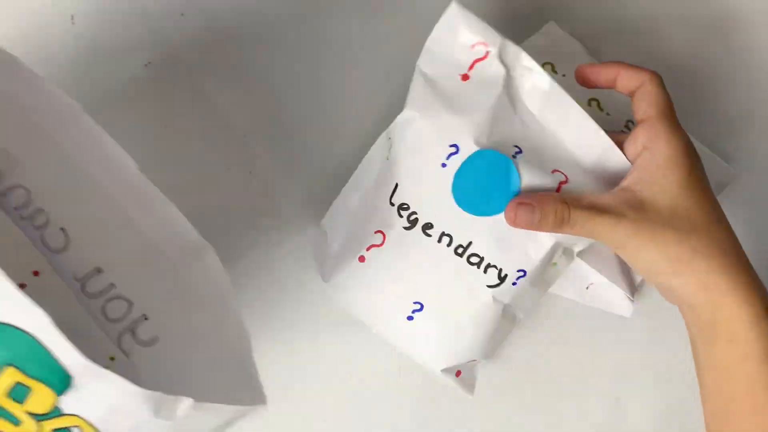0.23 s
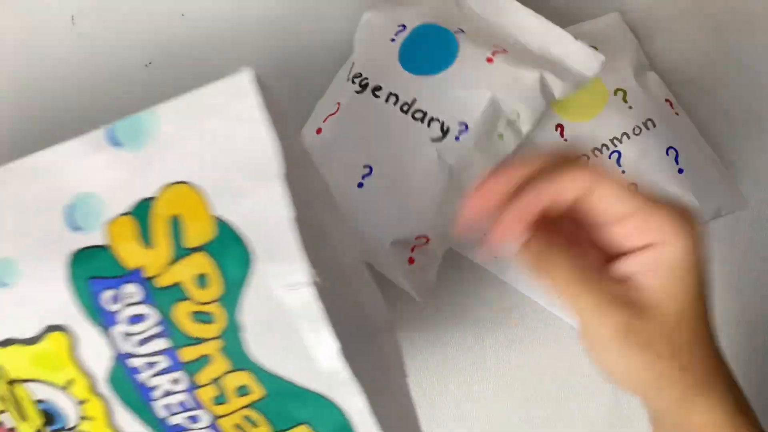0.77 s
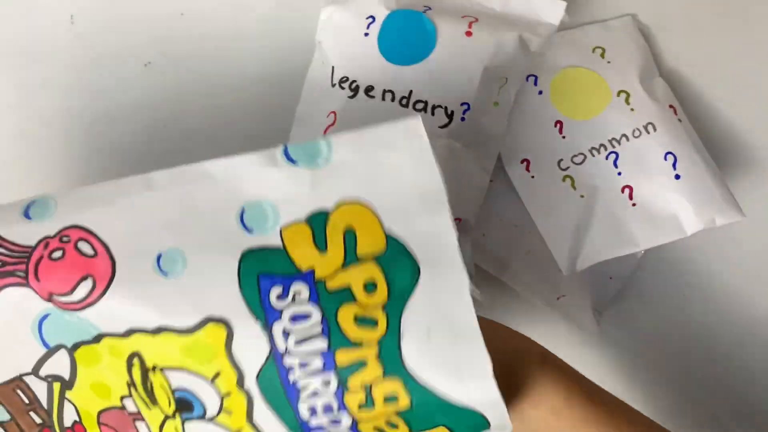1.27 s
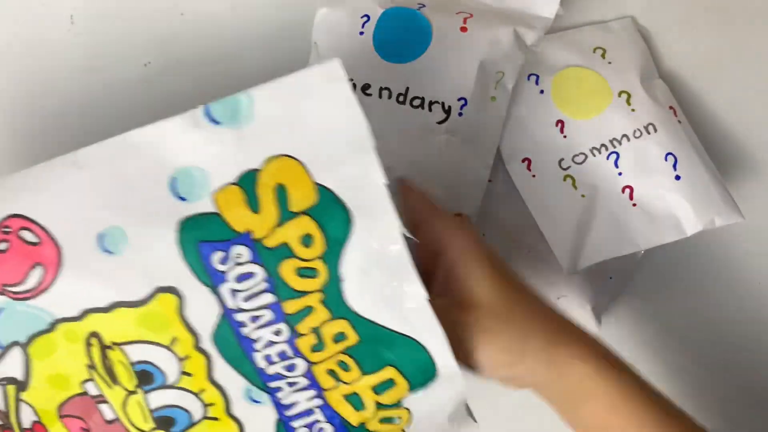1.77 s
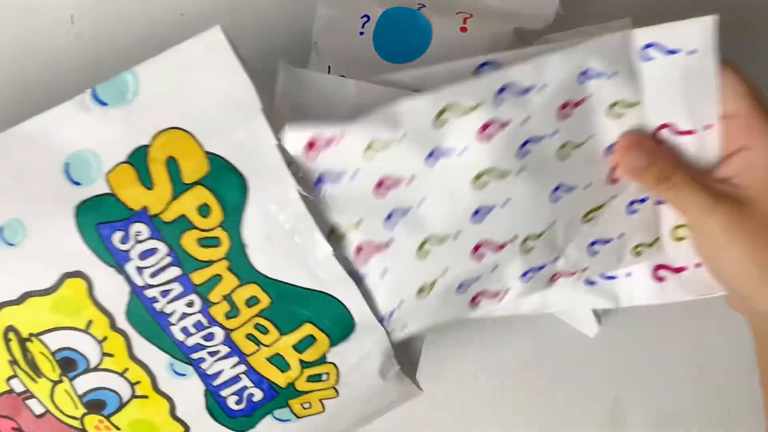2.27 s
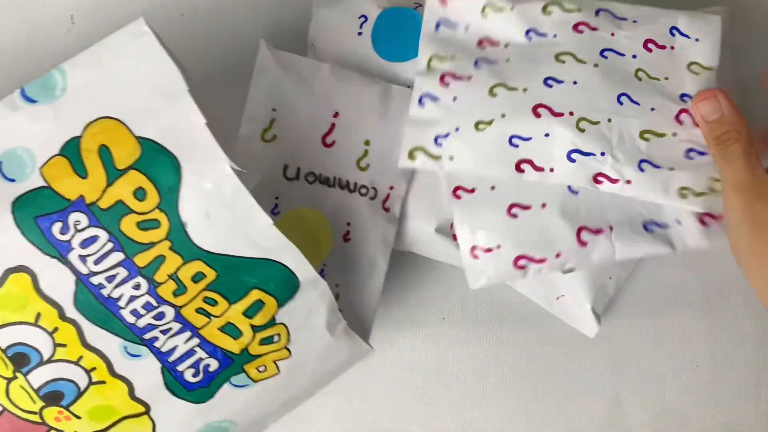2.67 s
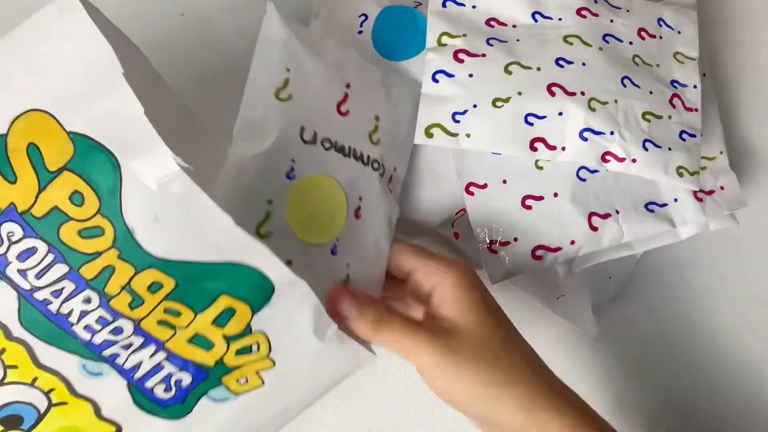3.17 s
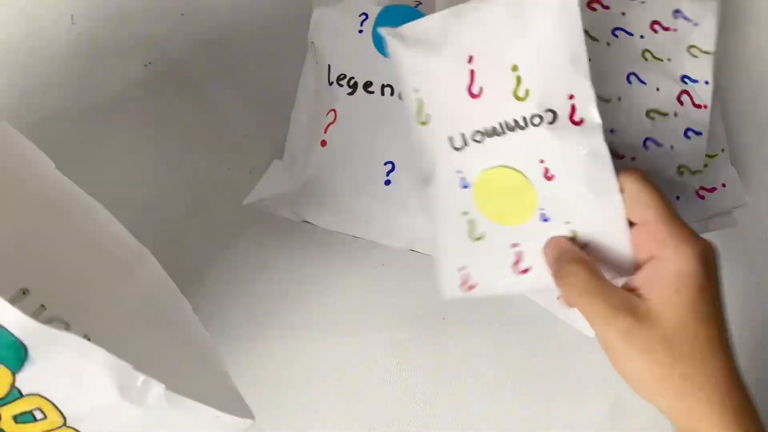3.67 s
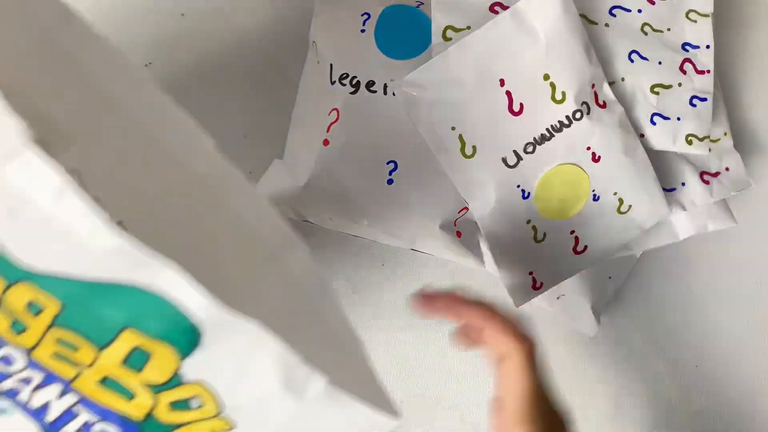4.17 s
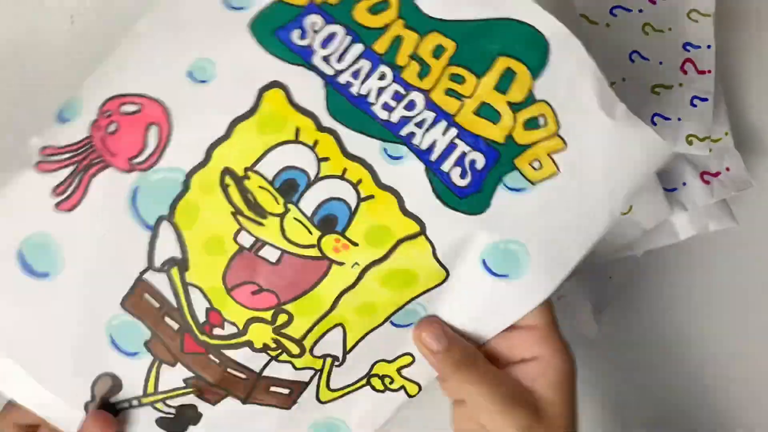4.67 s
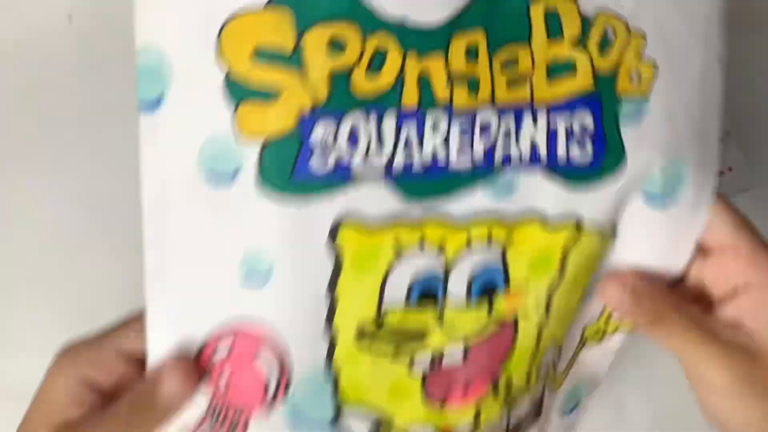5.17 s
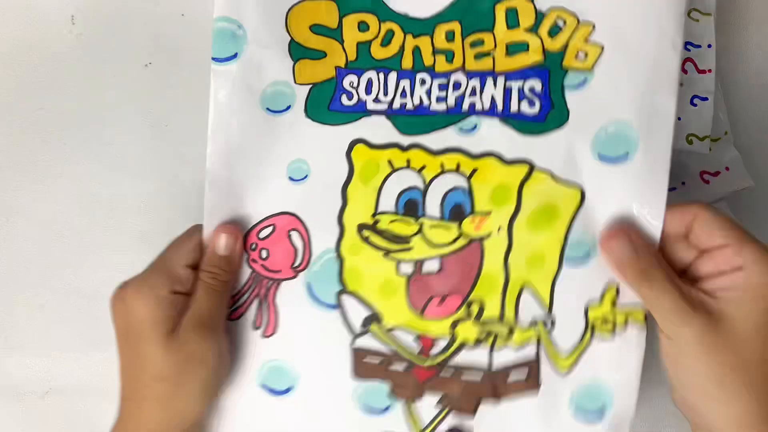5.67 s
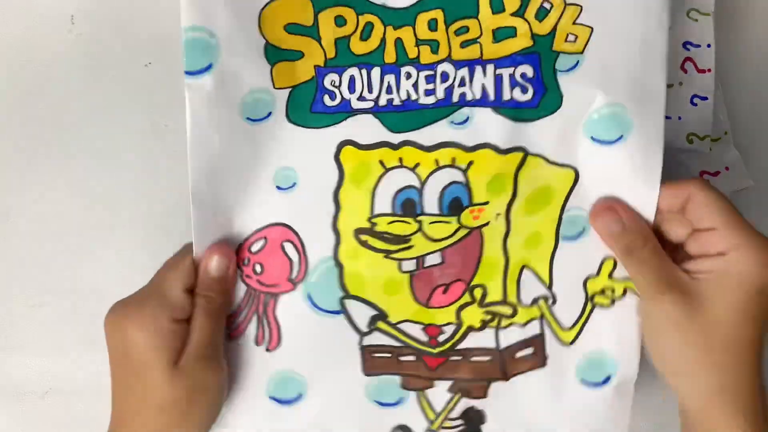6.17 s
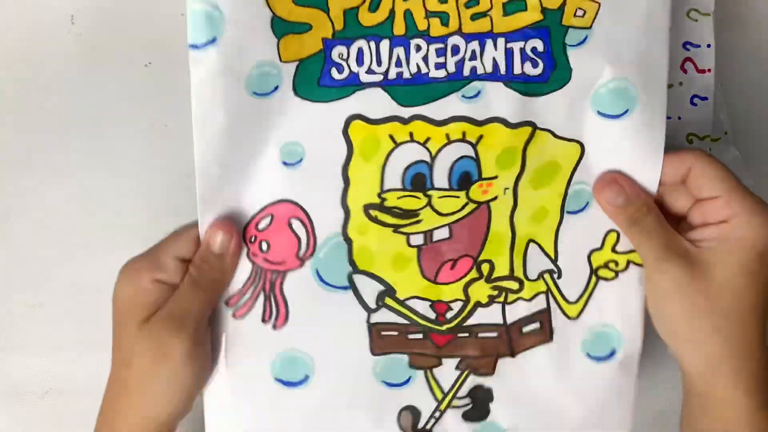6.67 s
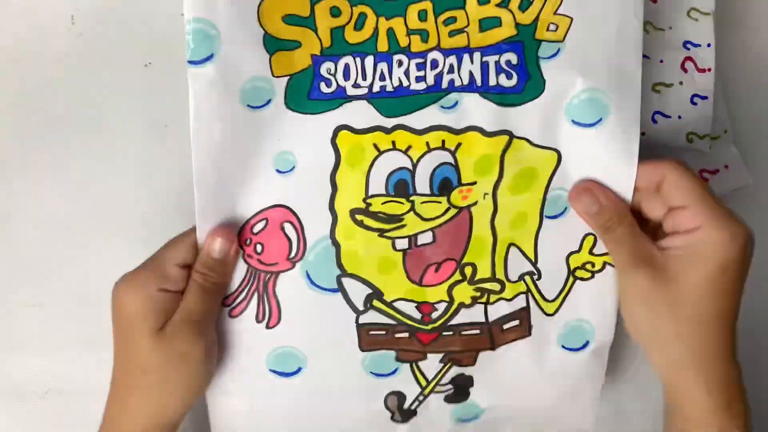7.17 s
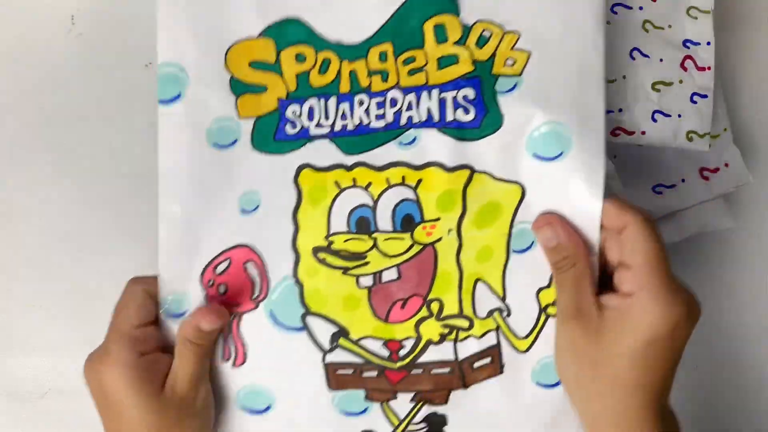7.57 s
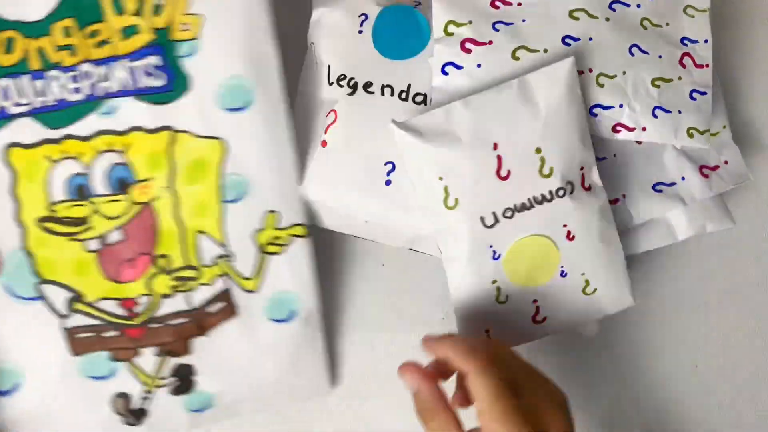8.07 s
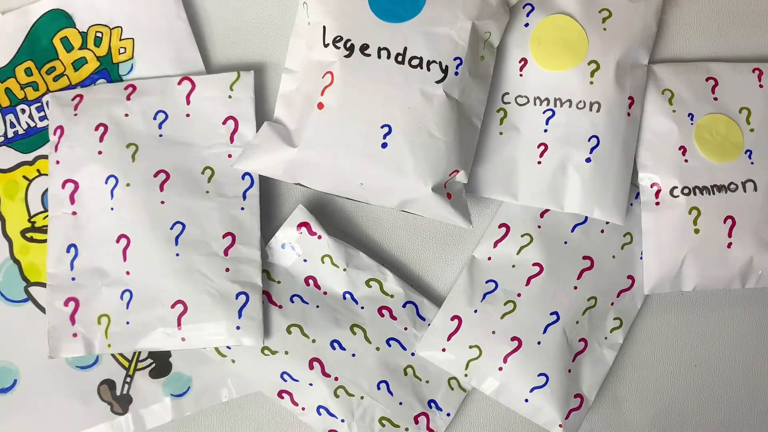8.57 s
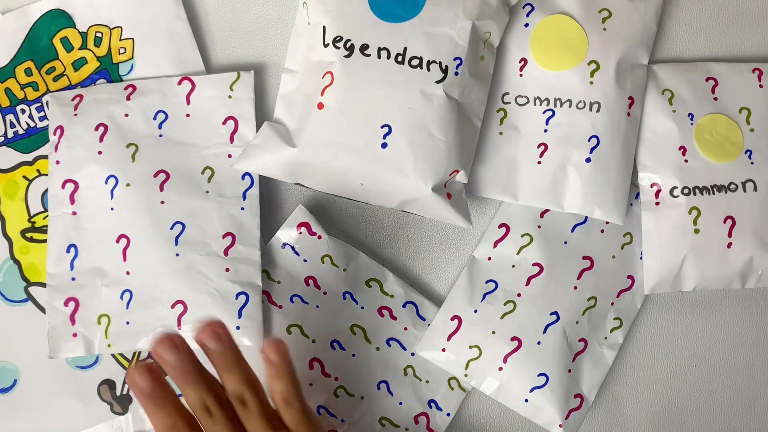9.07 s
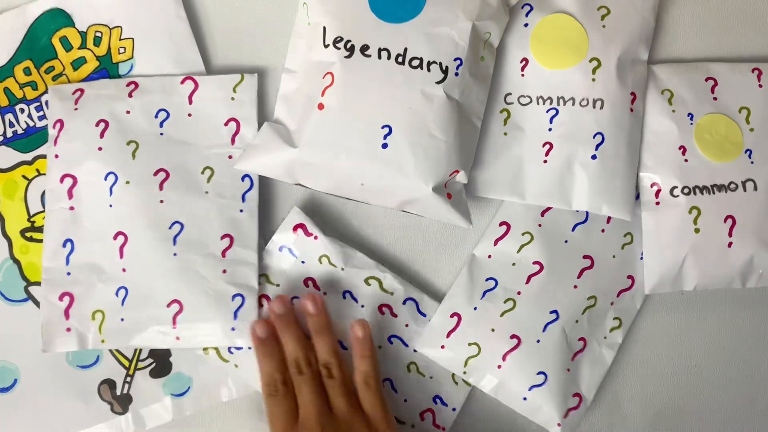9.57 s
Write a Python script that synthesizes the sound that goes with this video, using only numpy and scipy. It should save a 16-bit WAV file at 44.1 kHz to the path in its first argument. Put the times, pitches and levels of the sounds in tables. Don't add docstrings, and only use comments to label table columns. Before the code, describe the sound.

Close stereo microphone above a table in a small, fairly dry room. A crisp paper snap, then small stiff bags are pulled out and piled with dense crackles, pops and grainy sliding. A large bag is turned and shaken with hollow flaps and soft air thumps. Near the end the handling nearly stops and low room rumble dominates.

```python
import sys
import numpy as np
from scipy import signal
from scipy.fft import rfft, irfft, next_fast_len
from scipy.io import wavfile
from scipy.ndimage import uniform_filter1d, minimum_filter1d

SR = 44100
rng = np.random.default_rng(int(sys.argv[2]) if len(sys.argv) > 2 else 0)


def unload_audio(sound):
    columns = np.transpose(np.atleast_2d(sound))
    steps = np.round(np.clip(columns, -1, 1) * 32767)
    wavfile.write(sys.argv[1], SR, steps.astype(np.int16))


def invert_db(x):
    u = np.asarray(x, float) / 20
    return 10 ** u


N = 433062
CHANGE_S = 8.468
LEAD_S = 0.02

# (resonance [Hz], width [Hz], level [dB])
PANELS = [(341, 37, 1.5), (610, 173, -2), (709, 94, 5.5), (873, 104, -8), (1024, 224, -13),
          (1598, 150, -24), (2150, 410, -60), (2870, 2800, -36.5), (3620, 530, -17)]


def rms_one(x):
    return x / np.sqrt(np.mean(x ** 2) + 1e-20)


def at_hz(points, hz):
    table = np.array(points)
    return invert_db(np.interp(np.log(hz + 1), np.log(table[:, 0]), table[:, 1]))


def colour(x, points):
    size = next_fast_len(N)
    gain = at_hz(points, np.fft.rfftfreq(size, 1 / SR))
    return irfft(rfft(x, size) * gain, size)[..., :N]


def drift(rate):
    r = np.exp(-40 * np.pi * rate / SR)
    slow = signal.lfilter([1], [1, -2 * r, r * r], rng.standard_normal(N // 20 + 2002))[2000:]
    return np.interp(np.arange(N) / 20, np.arange(len(slow)), rms_one(slow))


def resonance(x, hz, width_hz):
    r = np.exp(-np.pi * width_hz / SR)
    poles = [1, -2 * r * np.cos(2 * np.pi * hz / SR), r * r]
    return signal.lfilter([(1 - r * r) / 2, 0, (r * r - 1) / 2], poles, x + 1e-18)


def cut(x, hz, kind, order=2):
    return signal.sosfilt(signal.butter(order, hz, kind, fs=SR, output="sos"), x)


def reflections(x, t60, level_db):
    t = np.arange(int(0.25 * SR)) / SR
    tail = rng.standard_normal(len(t)) * invert_db(-60 * t / t60) * (t > 0.001)
    return invert_db(level_db) * signal.fftconvolve(x, tail / np.linalg.norm(tail))[:N]


def grains(per_s, spread_db, clump_db):
    sizes = invert_db(spread_db * np.minimum(rng.exponential(1, N), 3.5)) * rng.choice([-1, 1], N)
    return sizes * (rng.random(N) < per_s / SR) * invert_db(clump_db * drift(30))


def strokes(rows, rest_db):
    take_up_db_per_s, let_go_db_per_s = 892, 311
    t, power = np.arange(0, N + 64, 64) / SR, invert_db(2 * rest_db)
    for s, length, db in rows:
        rise = take_up_db_per_s * np.maximum(s - t, 0)
        fall = let_go_db_per_s * np.maximum(t - s - length, 0)
        heard = (t < CHANGE_S) | (s > CHANGE_S)
        power = power + invert_db(2 * (db - np.minimum(rise + fall, 100))) * heard
    return np.interp(np.arange(N) / SR, t, 10 * np.log10(power))


def rumble():
    # (time [s], level [dB])
    shaking = [(0.0, -36.5), (0.91, -37), (0.96, -26.5), (2.07, -38.5), (4.32, -36.5), (4.47, -33),
               (5.03, -39.5), (5.31, -24.5), (5.4, -43), (5.9, -31.5), (7.73, -45), (8.44, -25.5)]
    # (frequency [Hz], width [Hz], level [dB])
    room_modes = [(40.7, 70, -10), (56.6, 17, -2.5), (77.3, 16, -0.5), (126, 24, -0.5), (170.6, 31, -1),
                  (205, 74, -20)]
    since = np.arange(N) / SR - CHANGE_S
    times, levels = np.transpose(shaking)
    shaking_db = np.interp(np.arange(N) / SR, times, levels)
    later_db = -26.5 + 2 * since
    deep_db = uniform_filter1d(np.where(since < 0, shaking_db, later_db), size=800)
    modes = []
    for hz, width_hz, db in room_modes:
        once = resonance(rng.standard_normal(N), hz, 1.08 * width_hz)
        mode = rms_one(resonance(once, hz, 1.08 * width_hz))
        modes.append(invert_db(db + 2.3 * drift(5.6)) * mode)
    modes[2] = modes[2] * invert_db(11.5 * np.clip(since * 100, -1, 1))
    modes[0] = modes[0] * invert_db(7.9 * np.maximum(since, 0))
    deep = sum(modes[:3])
    deep = deep / np.sqrt(uniform_filter1d(deep ** 2, size=SR))
    upper_db = -38.5 + 0.45 * (deep_db + 36.5)
    return invert_db(deep_db + 1.0) * deep + invert_db(upper_db) * rms_one(sum(modes[3:]))


def faint_hiss():
    # (frequency [Hz], density [dB per Hz])
    spectrum = [(250, 25.5), (500, 1.5), (1000, 4), (2000, 3), (3800, -19), (4700, -26), (8000, 3),
                (15500, 0)]
    noise = cut(colour(rng.standard_normal(N), spectrum), 150, "high")
    return invert_db(-53.5 + 0.67 * drift(7.0)) * rms_one(noise)


def dragging():
    # (start [s], length [s], level [dB])
    drags = [
        (.97, 0.42, -32.5),
        (1.72, 0.17, -33),
        (3.45, 0.6, -44.5),
        (3.9, 0.37, -46),
        (7.55, 0.2, -40),
        (7.95, 0.49, -38),
        (8.7, 0.31, -55),
        (9.3, 0.47, -63),
    ]
    rub = cut(cut(rng.standard_normal(N), 130, "high"), 433, "low", order=3)
    return invert_db(strokes(drags, rest_db=-60.0) + 1.56 * drift(17)) * rms_one(rub)


def sliding():
    # (start [s], length [s], hiss level [dB])
    slides = [(0.0, 0.012, -52), (.25, 0.31, -52.5), (.96, 0.26, -42.5), (1.27, 0.032, -37),
              (1.38, 0.15, -47.5), (1.56, 0.23, -31), (1.86, 0.39, -36), (2.25, 0.13, -42.5),
              (2.68, 0.026, -42.5), (3.2, 0.033, -51.5), (3.3, 0.12, -43), (3.44, 0.0052, -41),
              (3.535, 0.007, -53.5), (3.62, 0.025, -53), (3.69, 0.031, -43.5), (3.79, 0.035, -38.5),
              (4.42, 0.095, -51), (4.28, 0.027, -57), (4.59, 0.028, -52), (4.62, 0.056, -43.5),
              (4.72, 0.16, -54), (5.16, 0.013, -48), (5.2, 0.085, -46), (5.5, 0.25, -56.5),
              (5.9, 0.034, -60), (6.47, 0.01, -46), (6.2, 0.22, -57.5), (7.0, 0.46, -59.5),
              (7.43, 0.019, -45.5), (7.64, 0.033, -53), (7.86, 0.38, -54.5), (8.28, 0.06, -44.5),
              (9.17, 0.025, -51), (9.28, 0.062, -54.5)]
    # (frequency [Hz], density [dB per Hz])
    fibre_spectrum = [(1500, -3), (3000, -3), (4500, 4), (6000, -0.5), (9000, -5.5), (15500, -2.5)]
    fibres = colour(grains(per_s=24000, spread_db=1.5, clump_db=1.5), fibre_spectrum)
    return invert_db(strokes(slides, rest_db=-63) + 7.5) * rms_one(fibres)


def handling():
    # (start [s], length [s], panel rustle [dB], crease crackle [dB])
    grips = [(0.146, 0.42, -47.5, -47), (0.643, 0.15, -54, -51.5), (0.933, 0.42, -35, -36.5),
             (1.423, 0.31, -40, -34), (1.635, 0.6, -37.5, -32), (2.238, 0.33, -43, -46),
             (2.635, 0.12, -38.5, -43.5), (2.994, 0.082, -48.5, -46.5), (3.17, 0.13, -40, -40),
             (3.28, 0.23, -42, -60), (3.527, 0.49, -66, -54), (3.953, 0.34, -74, -72),
             (4.408, 0.089, -28.5, -39), (4.588, 0.17, -36, -42), (4.757, 0.27, -48.5, -52.5),
             (5.112, 0.2, -30, -33.5), (5.395, 0.23, -44.5, -49), (5.682, 0.3, -37.5, -44.5),
             (5.975, 0.88, -65, -111), (7.183, 0.36, -49, -52), (7.604, 0.22, -39, -62),
             (7.858, 0.57, -43.5, -45.5), (8.72, 0.08, -71, -60), (9.19, 0.051, -44, -47),
             (9.3, 0.059, -49, -48), (9.534, 0.05, -45, -49)]
    # (start [s], length [s], panel rustle [dB], crease crackle [dB])
    shakes = [
        (6.046, 0.029, -27.5, -36.5),
        (6.182, 0.038, -36, -45),
        (6.314, 0.037, -27.5, -38),
        (6.452, 0.02, -33, -65),
        (6.589, 0.052, -46, -40),
        (6.726, 0.083, -49, -77.5),
        (6.87, 0.062, -47.5, -66),
        (7.015, 0.043, -38, -46),
        (7.104, 0.059, -34.5, -44),
    ]
    s, length, panel_db, crackle_db = np.transpose(grips + shakes)
    panel = strokes(zip(s, length, panel_db), rest_db=-71)
    crackle = strokes(zip(s, length, crackle_db), rest_db=-72.5)
    return panel, crackle


def rustle(panel_db, crackle_db):
    buckles = grains(per_s=1900, spread_db=3.4, clump_db=3.2)
    dealt = rng.integers(0, 3, N)
    walls = []
    for k, (hz, width_hz, level_db) in enumerate(PANELS):
        flutter_db = 3.5 * drift(15)
        ring = resonance(buckles * (dealt == k % 3), hz, 1.3 * width_hz)
        walls.append(invert_db(level_db + flutter_db) * rms_one(ring))
    low = rms_one(cut(sum(walls[:4]), 1960, "low"))
    high = rms_one(cut(sum(walls[4:]), 3850, "low", order=6))
    return invert_db(panel_db + 5.5) * low + invert_db(crackle_db + 3.5) * high


def pops():
    # (time [s], level [dB], pitch [Hz], bright tick [dB])
    small_buckles = [(0.941, -7, 1180, -34), (0.9721, -1, 1930, -20.5), (0.9843, 1.5, 1220, -31.5),
                     (1.017, -19, 2030, -37), (1.0864, -22, 1960, -42), (1.1974, -18, 1640, -26),
                     (1.27, 0, 1170, -28), (1.3294, -24, 1640, -44), (1.3744, -23, 1760, -26),
                     (1.554, -17, 2220, -49), (1.6044, -25.5, 1680, -20), (1.7424, -8, 1710, -27),
                     (1.7759, -7, 1430, -32), (1.8377, -4.5, 1560, -30), (1.8695, -18, 1600, -33),
                     (1.9699, -25, 1190, -35), (2.0608, -7, 1490, -29), (2.0835, -1, 1190, -29),
                     (2.139, -18, 1660, -39), (2.2044, -21, 3630, -11), (2.271, -21, 1220, -35),
                     (2.481, -26, 1280, -39), (2.5445, -25, 1610, -54), (2.992, -37, 1190, -54),
                     (3.052, -27, 2420, -44), (3.1605, -25, 2060, -31), (3.2326, -6, 3490, -15.5),
                     (3.444, -18, 1530, -16), (3.508, -24, 1120, -50), (3.5354, -22, 1880, -37),
                     (3.6162, -46, 3690, -53), (3.6311, -28, 3700, -43), (3.7005, -29, 1650, -29),
                     (3.8078, -16, 1670, -38), (7.6893, -7.5, 3270, -19), (7.7927, -36, 1160, -65),
                     (7.86, -33, 1750, -28), (8, -30.5, 1750, -32), (8.1833, -27, 1290, -30),
                     (8.23, -33, 1610, -56)]
    # (time [s], level [dB], pitch [Hz], bright tick [dB])
    large_buckles = [(4.4094, -6, 1800, -41), (4.4363, -17, 1210, -43), (4.4568, 2, 1690, -25),
                     (4.4994, -12, 2040, -45), (4.5444, -30, 1940, -52), (4.6924, -20, 1310, -21),
                     (5.1004, -24, 1590, -54), (5.1174, -24, 1540, -54), (5.1377, -17.5, 1050, -47),
                     (5.1514, -9, 1360, -42), (5.1617, 3, 1730, -35), (5.1704, -10, 1300, -20),
                     (5.224, -6.5, 1700, -39), (5.2354, -11.5, 1640, -40), (5.2544, -9, 1270, -34),
                     (5.2994, -23, 1100, -30), (5.4236, -34, 1170, -55), (5.5742, -20.5, 1750, -49),
                     (5.7164, -29, 1370, -11), (5.9389, -7.5, 1880, -42), (6.0844, -17, 1520, -47),
                     (6.2034, -10, 2950, -42), (6.3046, -18, 1290, -35), (6.3465, -18.5, 1410, -24),
                     (6.3674, -22, 1110, -48), (6.3824, -30, 1550, -50), (6.4742, -6, 1900, -11.5),
                     (6.5884, -20, 1200, -55), (6.6403, -25, 1350, -59), (6.7474, 0, 1150, -34),
                     (6.79, -23.5, 1210, -55), (6.8864, -29, 1270, -55), (6.986, -18.5, 1210, -45),
                     (7.0015, -10, 1140, -45), (7.0334, -11, 1140, -41), (7.0484, -12, 1210, -50),
                     (7.0913, -16.5, 1270, -39), (7.1454, -12, 1240, -52), (7.1696, -21, 1130, -52),
                     (7.2734, -22.5, 1190, -53)]
    # (time [s], level [dB], pitch [Hz], bright tick [dB])
    flips = [(1.4336, -1.5, 1470, -9), (4.477, 2, 1400, -35), (4.609, -19, 2000, -50),
             (5.946, -13, 3200, -41), (6.217, -14, 3030, -40), (6.862, -23, 1340, -49),
             (7.66, -17, 1200, -38), (8.767, -36, 2870, -67), (9.293, -13, 1480, -49),
             (1.838, -6, 3060, -28), (3.794, -19.5, 2470, -22), (5.717, -12, 3180, -33),
             (6.475, -7, 2630, -28), (9.538, -17.5, 1530, -43)]
    rise_s, t60_s = 0.0016, 0.013
    damping = 0.099
    out, t = np.zeros(N + 2000), np.arange(1500) / SR
    decay = invert_db(-60 * t / t60_s)
    for s, db, hz, tick_db in small_buckles + large_buckles + flips:
        push = rng.standard_normal(len(t)) * (1 - np.exp(-t / rise_s)) * decay
        ring = resonance(push, hz, damping * hz)
        tick = cut(push * decay, 3000, "high")
        start = round(s * SR)
        out[start:start + len(t)] += invert_db(db - 5) * ring / np.abs(ring).max()
        out[start:start + len(t)] += invert_db(tick_db + 2.5) * tick / np.abs(tick).max()
    return out[:N] + reflections(out[:N], t60=0.12, level_db=-15)


def creases():
    # (time [s], panel [dB], edge [dB], crack [dB])
    pulled = [(0.0, -10, -15, -39), (0.1, -25, -37, -40.5), (0.256, -21, -109, -67), (0.539, -31, -25, -41),
              (0.934, -5.5, -17.5, -52), (0.958, -1.5, -39, -49), (0.971, -14, -9.5, -23.5),
              (1.121, -14, -59, -60), (1.258, -36, -27, -70), (1.28, -6.5, -10.5, -20),
              (1.396, -18, -21, -39), (1.436, -9.5, -21.5, -44), (1.498, -13, -26, -73),
              (1.725, -8.5, -23, -29), (1.74, -11, -25, -37), (1.784, -5, -15, -50),
              (1.837, -38, -16.5, -23), (2.046, -21.5, -21, -26), (2.085, -11.5, -24, -37),
              (2.137, -15, -30, -28)]
    # (time [s], panel [dB], edge [dB], crack [dB])
    piled = [(2.44, -20, -34, -45), (2.523, -18.5, -45, -39), (2.571, -16, -38, -49),
             (2.625, -28.5, -47, -59), (2.674, -19, -36, -41), (2.701, -18, -24, -41),
             (2.717, -13.5, -13, -35), (3.237, -1.5, -7.5, -21.5), (3.261, -5.5, -15, -15),
             (3.28, -7.5, -12, -12.5), (3.413, -14.5, -26.5, -58), (3.474, -6, -22.5, -58),
             (3.717, -14.5, -29, -34.5), (3.796, -19.5, -27.5, -38), (7.446, -24, -31, -39),
             (7.493, -12, -29.5, -37.5), (7.599, -27, -27.5, -40), (7.661, -4, -22, -18.5),
             (7.689, -42, -14, -12), (7.842, -21, -60, -71), (8.075, -13.5, -29, -40.5),
             (8.332, -16, -25.5, -42), (8.407, -51, -26, -36.5), (9.175, -17, -23, -32),
             (9.187, -9.5, -12, -27), (9.294, -14, -25.5, -39), (9.529, -17.5, -21.5, -29.5)]
    # (time [s], panel [dB], edge [dB], air thump [dB])
    turned = [(4.376, -18, -28.5, -31), (4.397, -5.5, -13.5, -16), (4.444, -23, -26, -23),
              (4.456, -6, -8, -26), (4.474, -0.5, -8, -17), (4.521, -12, -34, -27),
              (4.616, -19.5, -21, -33), (4.63, -8.5, -17, -40), (4.681, -6.5, -18.5, -8),
              (4.753, -23.5, -22, -24.5), (4.788, -18.5, -33, -30), (4.835, -10.5, -27.5, -28),
              (4.959, -12.5, -22, -22.5), (5.114, -10.5, -41, -29.5), (5.164, -10.5, -2.5, -20),
              (5.228, -13, -10.5, -17.5), (5.277, -5, -15, -31), (5.361, -20, -35, -31),
              (5.519, -20, -63, -32.5), (5.533, -18, -25, -52), (5.554, -17, -22, -33),
              (5.631, -27.5, -32.5, -41)]
    # (time [s], panel [dB], edge [dB], air thump [dB])
    shaken = [(5.684, -4.5, -9, -15), (5.715, -24, -16, -38), (5.785, -11, -23, -25.5),
              (5.798, -6.5, -32.5, -25), (5.855, -21, -16, -28), (5.886, -10.5, -39, -28),
              (5.916, -21, -23, -32), (5.941, -1.5, -11, -23), (6.045, -6, -35, -36),
              (6.078, -9.5, -24.5, -26), (6.098, -21, -40, -24), (6.182, -14.5, -37, -31),
              (6.213, -5, -9, -8), (6.316, -12, -34, -34), (6.365, -11.5, -36, -43),
              (6.473, -8.5, -12, -21), (6.577, -13.5, -44, -21), (6.611, -15.5, -50, -39),
              (6.63, -9.5, -33, -23.5), (6.716, -21, -25, -32), (6.744, 2.5, -8, -17.5),
              (6.86, -13.5, -42, -27.5), (6.879, -8.5, -34, -30), (6.986, -22, -26.5, -41),
              (7.002, -5.5, -29, -26), (7.031, -10.5, -16, -20), (7.091, -16, -57.5, -35),
              (7.139, -3.5, -26, -25), (7.17, -11, -29, -33), (7.258, -21.5, -41.5, -27.5)]
    # (time [s], panel [dB], edge [dB], air thump [dB])
    sagged = [
        (0.381, -22, -34, -31),
        (0.998, -16, -20.5, -23),
        (3.702, -32, -42, -27.5),
        (3.759, -25, -36, -32.5),
        (3.887, -30, -55, -44.5),
        (5.309, -12.5, -22.5, -27),
        (5.673, -19, -27.5, -24),
        (6.339, -10.5, -22, -19),
        (6.443, -21, -26.5, -28),
        (6.7, -41, -44, -30.5),
    ]
    rows = []
    for s, db, edge_db, crack_db in pulled + piled:
        rows.append((s, db, edge_db, crack_db, db - 8, False))
    for s, db, edge_db, thump_db in turned + shaken + sagged:
        rows.append((s, db, edge_db, edge_db - 19.5, thump_db + 8.0, True))
    return rows


def slips(t60, size):
    t = np.arange(size) / SR - LEAD_S
    chance, white = rng.random(size), rng.standard_normal(size)
    clumps = np.repeat(invert_db(rng.normal(0, 6.1, size // 64)), 64)
    creak = invert_db(-17 + 900 * np.minimum(t, 0)) * (t < 0.003)
    burst = np.clip(t / 0.0015, 0, 1) * invert_db(-60 * (np.maximum(t, 0) / t60) ** 1.23)
    drive = white * ((chance < 2500 / SR) + 0.17) * clumps * (creak + burst)
    drive[round(LEAD_S * SR) + 30] += 2.75 * np.sign(white[0])
    return np.abs(t), drive


def struck(t60, size):
    t, drive = slips(t60, size)
    walls, bend = rng.normal(0, 4.5, len(PANELS)), rng.normal(0, 1.1, len(PANELS))
    rings = []
    for (hz, width_hz, db), own_db, shift in zip(PANELS, walls, bend):
        brief = drive * invert_db(-hz / 150 * t / t60)
        ring = resonance(brief, hz * invert_db(shift), 1.65 * width_hz)
        rings.append(invert_db(db + own_db) * np.sqrt(300 / width_hz) * ring)
    crack = drive * invert_db(-110 * t / t60)
    push = np.roll(drive * invert_db(-66.5 * t / t60), round(0.007 * SR))
    thump = resonance(push, 260 * invert_db(0.97 * walls[0]), 130)
    return sum(rings[1:5]), sum(rings[4:]), crack, thump, np.abs(push)


def snaps():
    out, size = np.zeros(N + 6000), 3584
    s, peak_db, edge_db, crack_db, thump_db, large = np.transpose(creases())
    brightness_db = edge_db - peak_db + 1.0
    t60 = 0.039 * invert_db(-0.096 * brightness_db + 1.5 * rng.standard_normal(len(s)))
    sources = [struck(d, size) for d in np.clip(t60, 0.008, 0.07)]
    body, edge, crack, thump, push = np.swapaxes(sources, 0, 1)
    crack = cut(cut(crack, 4800, "high"), 3500, "low", order=1)
    dull = cut(crack, 7900, "low", order=5)
    crack = np.where(large[:, None] > 0, dull, crack)
    puff = resonance(cut(push, 55, "high"), 110, 71)
    parts = [(cut(body, 1200, "low", order=3), peak_db + 1.0),
             (cut(edge, 3880, "low", order=6), edge_db + 9.5),
             (crack, crack_db + 17.5),
             (cut(thump, 304, "low"), thump_db - 1.5),
             (puff, thump_db - 6.5)]
    sounds = sum(invert_db(db)[:, None] * x / np.abs(x).max(axis=1, keepdims=True) for x, db in parts)
    for start, sound in zip(np.round(s * SR).astype(int), sounds):
        out[start:start + size] += sound
    return out[round(LEAD_S * SR):][:N]


def ports(x):
    # (frequency [Hz], level [dB])
    unlike = [(100, -27), (350, -17), (900, -16), (2600, -5), (3600, -11), (4300, -22), (5200, -20),
              (15000, -15)]
    # (frequency [Hz], phase [rad], level [dB])
    right_port = [(0, 0, -.6), (400, 0, -2), (700, -.2, -4), (880, -.5, -9), (960, 2.5, -7), (1200, 1.8, 0),
                  (1700, .4, 3), (2700, -1.6, 3), (3450, -1.5, 0), (4750, -np.pi, 0), (9000, -3 * np.pi, 0),
                  (13250, -5 * np.pi, 0), (14900, -6 * np.pi, 0)]
    size = next_fast_len(N)
    hz, (port_hz, phase, db) = np.fft.rfftfreq(size, 1 / SR), np.transpose(right_port)
    late = invert_db(np.interp(hz, port_hz, db)) * np.exp(1j * np.interp(hz, port_hz, phase))
    place = np.repeat(rng.integers(0, 5, N // 2000 + 1), 2000)[:N]
    scattered = np.zeros(N)
    for k in range(5):
        there = uniform_filter1d(1.0 * (place == k), size=600)
        scattered += reflections(x * there, t60=0.008, level_db=6.5)
    own = colour(scattered, unlike)
    return np.array([x + own, irfft(rfft(x - own, size) * late, size)[:N]])


def joint_stereo(x, mid_db, side_db, jump_db):
    mid_side = np.array([x[0] + x[1], x[0] - x[1]]) / 2
    hz, _, both = signal.stft(mid_side, SR, nperseg=1024, noverlap=768)
    power = uniform_filter1d(np.abs(both) ** 2, size=11, axis=1)
    power = uniform_filter1d(power, size=7, axis=2) + 1e-16
    treble = 10 * np.log10(power[:, hz > 3000].sum(axis=(0, 1)))
    calm = minimum_filter1d(treble - np.roll(treble, 3) < jump_db, size=4)
    open_to_drop = (hz > 4300)[:, None] & calm
    both[0] *= ~(open_to_drop & (power[0] < power[1] * invert_db(2 * mid_db)))
    both[1] *= ~(open_to_drop & (power[1] < power[0] * invert_db(2 * side_db)))
    both *= ~((hz > 15850)[:, None] & calm)
    mid, side = signal.istft(both, SR, nperseg=1024, noverlap=768)[1][:, :N]
    return np.array([mid + side, mid - side])


def scene():
    low = cut(rumble(), 25, "high")
    hiss = faint_hiss()
    paper = dragging() + sliding() + rustle(*handling()) + snaps()
    room = reflections(paper, t60=0.17, level_db=-15)
    n = np.arange(N)
    room = room * ((n < CHANGE_S * SR) | (n > (CHANGE_S + 0.25) * SR))
    return ports(paper + room + low + hiss + pops())


def roll_off(x):
    return signal.sosfilt(signal.butter(12, 16980, fs=SR, output="sos"), x)


def record(dry):
    rounded = 0.85 * np.tanh(dry)
    top_cut = signal.cheby2(10, 40, 16900, fs=SR, output="sos")
    mix = joint_stereo(signal.sosfilt(top_cut, rounded), mid_db=-6.0, side_db=-5.0, jump_db=13.5)
    return roll_off(mix)


dry = scene()
out = record(dry)
unload_audio(out)
```